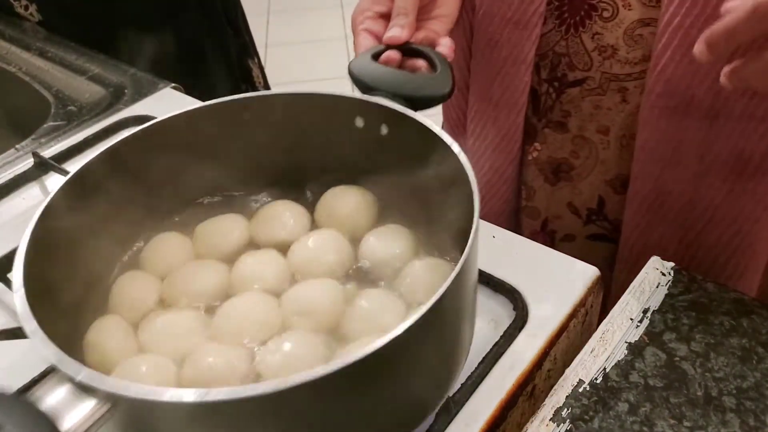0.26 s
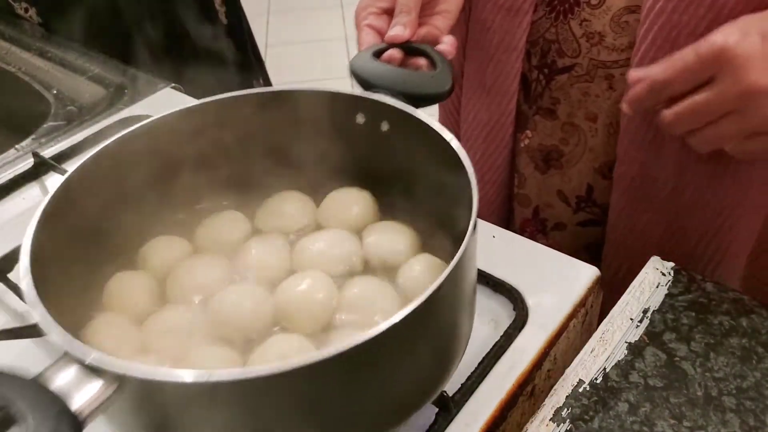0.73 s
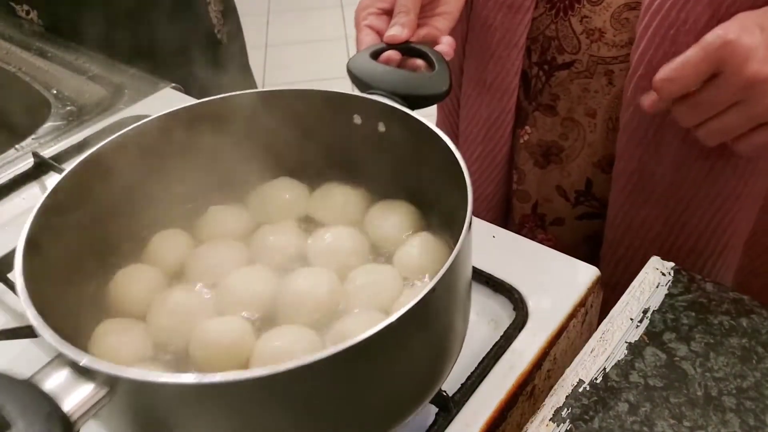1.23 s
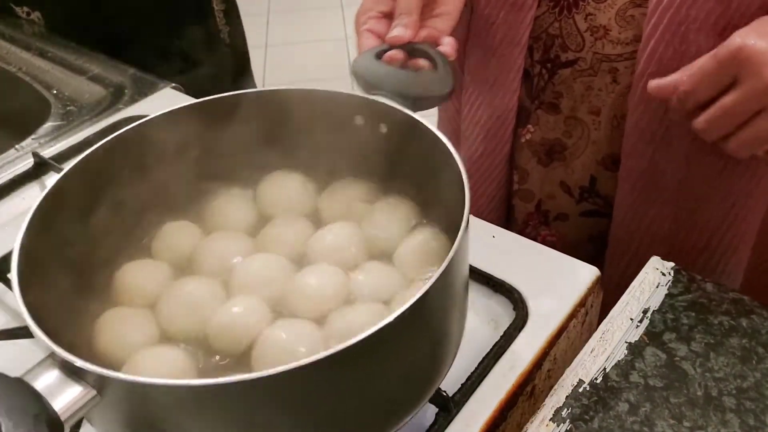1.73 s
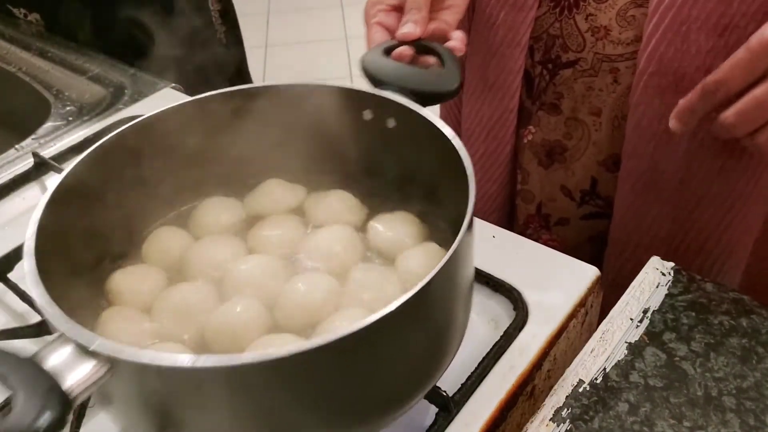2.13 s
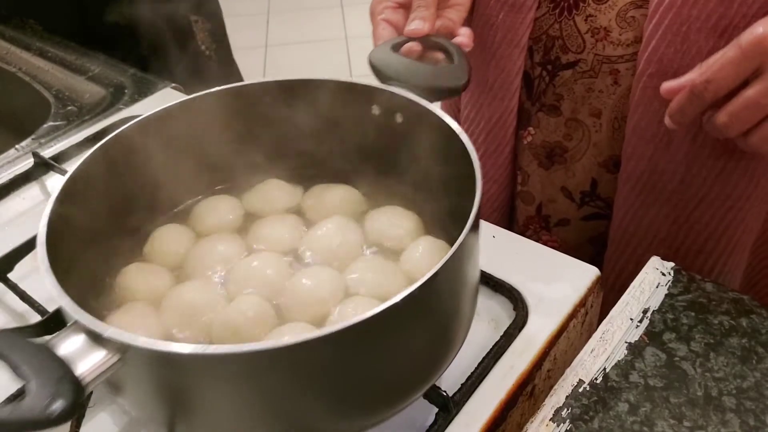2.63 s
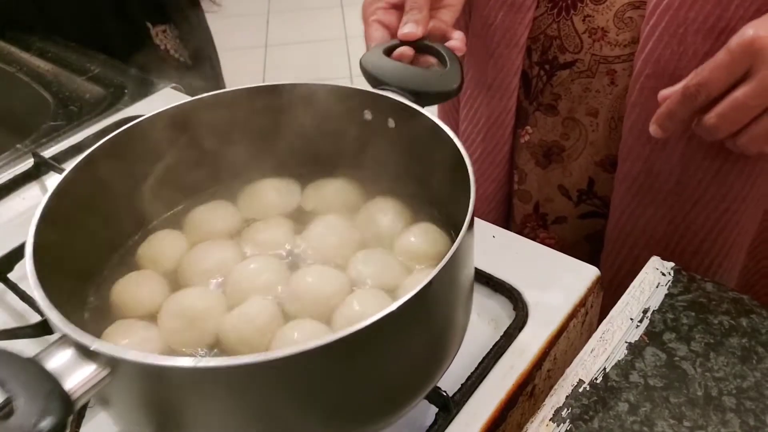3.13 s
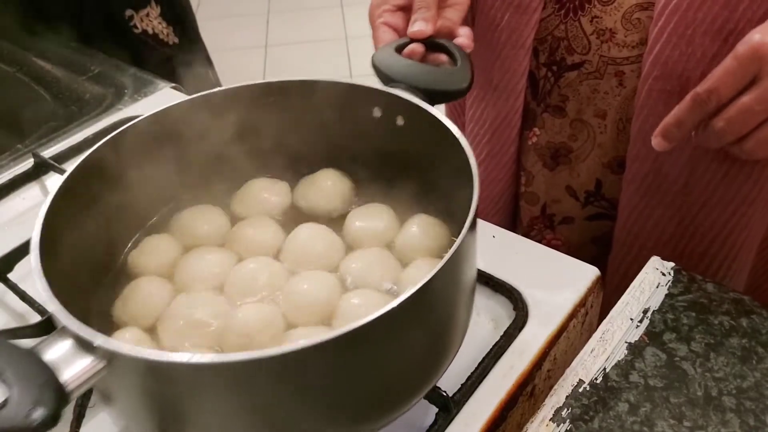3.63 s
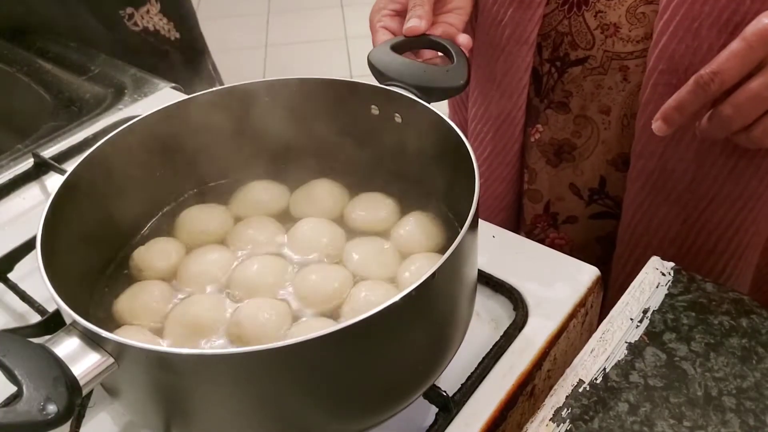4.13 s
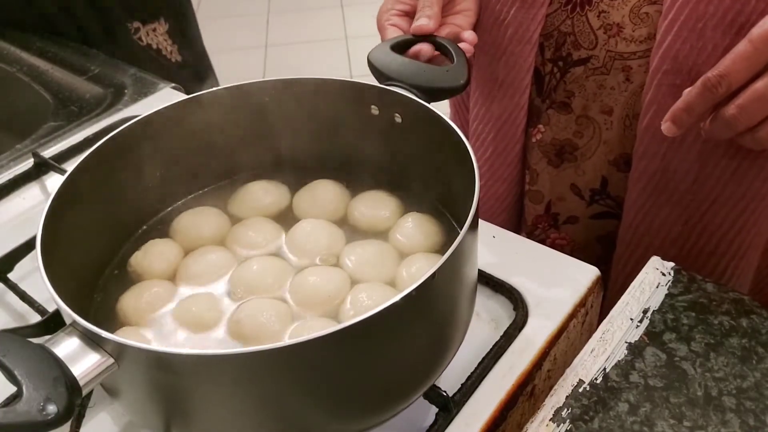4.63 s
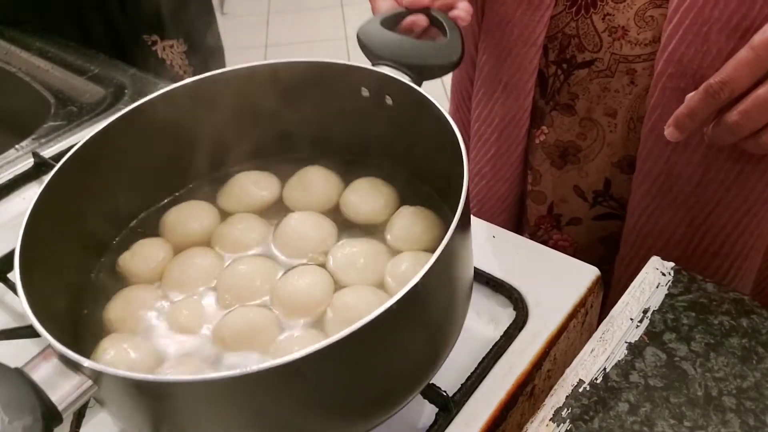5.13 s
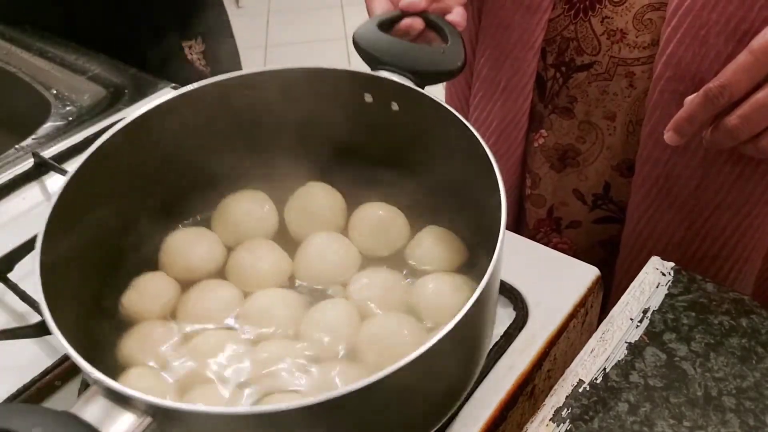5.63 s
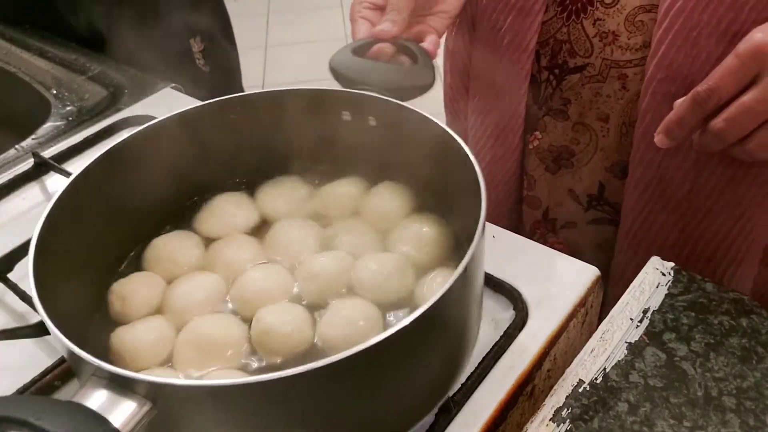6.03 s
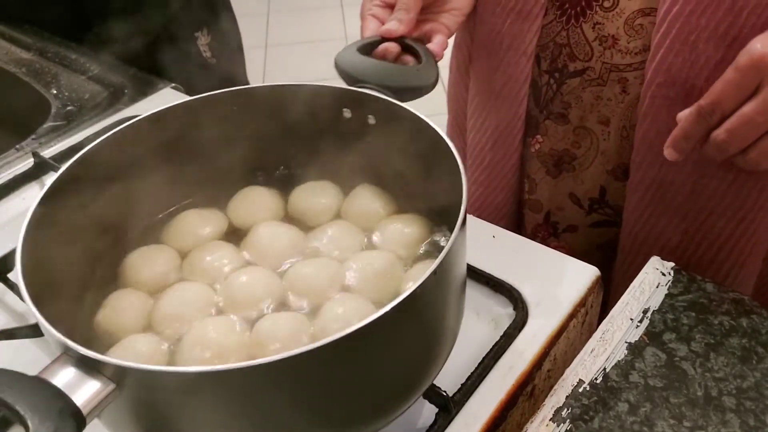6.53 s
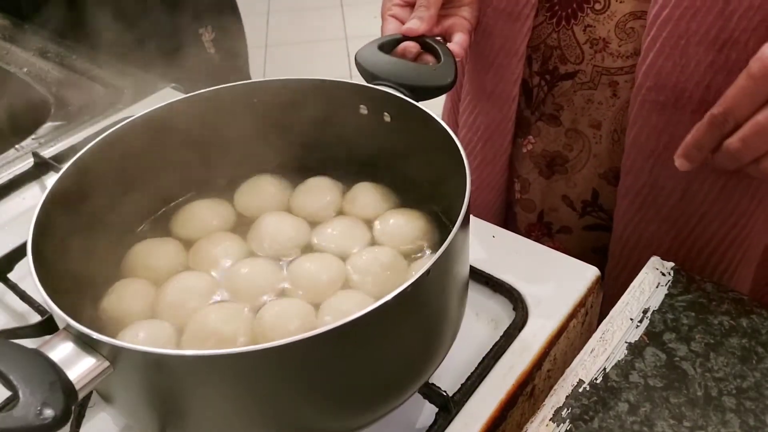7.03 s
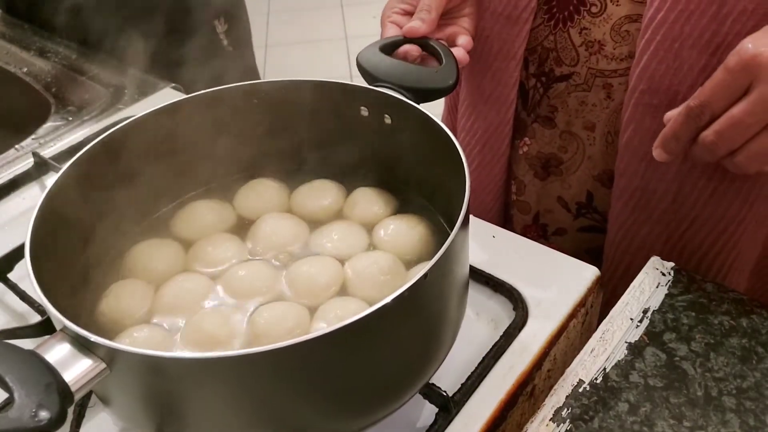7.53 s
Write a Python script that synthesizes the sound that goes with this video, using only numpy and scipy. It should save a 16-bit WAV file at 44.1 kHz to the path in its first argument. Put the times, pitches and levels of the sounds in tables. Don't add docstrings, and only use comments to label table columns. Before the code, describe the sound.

Quick rhythmic pot rubbing and soft dull knocks over burner hiss, then several heavy booming thumps with liquid sloshing, and finally gentle settling.

```python
import sys
import numpy as np
from scipy import signal
from scipy.fft import rfft, irfft, next_fast_len
from scipy.io import wavfile

SR = 44100
rng = np.random.default_rng(int(sys.argv[2]) if len(sys.argv) > 2 else 0)


def transcribe(u):
    v = np.clip(np.atleast_2d(u).T, -1, 1)
    q = np.round(v * 32767).astype(np.int16)
    wavfile.write(sys.argv[1], SR, q)


def gain_from_db(level_db):
    decades = np.asarray(level_db, float) / 20
    return 10 ** decades


N = 342392

# (frequency [Hz], level [dB per Hz])
HISS = [(30, 2.5), (100, 3), (250, -12.5), (550, -1.5), (900, -1), (1400, 1), (2500, -7), (3700, -7.5),
        (5700, -9.5), (8000, -5), (11000, -22.5), (13000, -33), (16000, -13)]
# (pitch [Hz], width [Hz], level [dB])
CAVITIES = [(664, 22, -67), (1898, 227, -56.5), (1871, 18, -67), (1902, 16, -68), (4440, 51, -68),
            (6910, 82, -69.5), (2470, 15, -67.5), (4527, 250, -59), (7056, 530, -59.5), (8260, 490, -68),
            (9124, 150, -65.5), (12400, 1300, -70), (13740, 350, -80)]
# (time [s], middle whistle level [dB], hiss level [dB])
FLOW = [(0.0, -65.5, -52), (0.5, -60.5, -50.5), (0.73, -59.5, -51), (1.23, -61, -52), (1.49, -58, -51),
        (2.2, -59.5, -50), (2.42, -61, -50.5), (3.63, -63.5, -50.5), (4.21, -60.5, -52), (4.43, -64, -55),
        (5.4, -63.5, -52.5), (5.84, -62.5, -53), (6.07, -64, -50.5), (7.13, -63, -52), (7.76, -65.5, -53.5)]
# (frequency [Hz], width [Hz], depth [0-1])
ECHO_DIPS = [(3680, 330, 0.44), (6250, 270, 0.83), (5650, 360, 0.7)]
# (frequency [Hz], likeness [-1 to 1])
LIKENESS = [(60, 0.7), (180, 0.99), (550, 0.43), (1650, -0.067), (4970, -0.028), (15000, -0.022)]
# (frequency [Hz], left over right [dB])
LEAN = [(600, 0.8), (1900, -1.5), (3300, -8.5), (4800, 3.5), (6900, -2.5), (9000, 5), (10500, -11),
        (15000, 1)]
# (time [s], peak [dB], pitch [Hz])
BUMPS = [(0.027, -35.5, 251), (0.176, -38, 223), (0.192, -34, 220), (0.193, -30.5, 312), (0.331, -37, 475),
         (0.485, -32, 320), (0.608, -36, 336), (0.646, -35, 248), (0.773, -37.5, 306), (0.793, -37, 255),
         (0.869, -35, 242), (0.909, -41, 258), (1.043, -42, 699), (1.043, -33.5, 318), (1.136, -44, 226),
         (1.313, -34, 306), (1.411, -32, 243), (1.566, -40, 256), (1.566, -31, 303), (1.588, -36, 240),
         (1.614, -29, 336), (1.707, -33, 330), (1.746, -28, 428), (1.882, -37, 221), (1.882, -30.5, 347),
         (1.912, -30, 470), (1.987, -43, 219), (1.989, -34, 320), (2.03, -35, 339), (2.122, -38, 423),
         (2.152, -38, 221), (2.154, -24.5, 328), (2.258, -32, 347), (2.301, -37, 248), (2.416, -37, 285),
         (2.522, -33, 283), (2.543, -41, 441), (2.648, -32, 299), (2.684, -26.5, 300), (2.788, -42, 307),
         (2.801, -36, 345), (2.921, -35.5, 293), (3.043, -37, 353), (3.054, -36, 221), (3.056, -28, 357),
         (3.093, -27, 480), (3.217, -27, 487), (3.228, -32, 227), (3.361, -42, 220), (3.362, -34, 344),
         (3.5465, -26, 500), (3.546, -26, 339), (3.636, -33.5, 304), (3.651, -32, 286), (3.675, -33, 312),
         (3.702, -28.5, 424), (3.819, -42, 320),
         (4.013, -33, 270), (4.08, -37, 275), (4.098, -34.5, 272), (4.12, -31, 406), (4.52, -41, 371),
              (4.529, -37, 277), (4.62, -44, 400), (4.718, -47, 646), (5.063, -32, 270), (5.079, -26, 295),
              (5.12, -28, 395), (5.173, -40, 272), (5.333, -51, 441), (5.354, -44, 530), (5.423, -25, 355),
              (5.503, -27, 341), (5.558, -35, 395), (5.625, -34, 339), (5.679, -44, 296), (5.711, -48, 339),
              (5.873, -33, 326), (5.982, -45, 338), (6.025, -42, 336), (6.057, -47, 312), (6.098, -41, 316),
              (6.136, -41, 362), (6.253, -41, 460), (6.386, -46, 340), (6.429, -44, 280), (6.438, -36, 470),
              (6.544, -41, 364), (6.567, -39, 495), (6.642, -41, 362), (6.782, -51, 700), (6.782, -38, 353),
              (6.917, -46, 460), (7.02, -43, 376)]
# (peak time [s], level [dB], relative grit [dB], relative sheet boom [dB], boom pitch [Hz])
JIGGLES = [(0.033, -47, -16.5, 6, 116), (0.206, -44.5, -17, 0, 105), (0.335, -46, -17.5, -3, 98),
           (0.503, -46.5, -20, 0, 113), (0.654, -50, -19.5, 0.5, 110), (0.799, -44, -20.5, -3, 105),
           (0.9, -42.5, -23, -3, 95), (1.063, -44, -19, -2, 94), (1.2, -51, -20.5, 1.5, 90),
           (1.345, -41.5, -21, 5, 110), (1.431, -41.5, -21.5, 2, 108), (1.509, -51, -23, -1, 108),
           (1.609, -37.5, -22, -2, 118), (1.718, -37, -25, -2, 116), (1.8, -50, -21, -9, 130),
           (1.907, -41, -22, 6, 116), (2.018, -38.5, -22, 3.5, 113), (2.174, -36, -24, -6, 90),
           (2.294, -39, -23.5, -1, 116), (2.437, -43.5, -20.5, -4, 105), (2.557, -43, -22, 2, 95),
           (2.693, -42, -23, 4, 110), (2.818, -45, -29, 4.5, 108), (2.95, -45.5, -23, -1, 132),
           (3.073, -39, -22, 0, 116), (3.236, -42, -19.5, 0.5, 113), (3.372, -37, -20.5, -5, 142),
           (3.554, -40.5, -21, 1.5, 110), (3.695, -43, -20, 4.5, 113), (3.829, -48, -19, -10, 121)]
# (peak time [s], level [dB], relative grit [dB], relative sheet boom [dB], boom pitch [Hz])
SETTLING = [(6.016, -51, -20, -1, 142), (6.176, -48.5, -19.5, -11, 142), (6.308, -47.5, -18, -5, 102),
            (6.45, -51.5, -15.5, -4, 110), (6.561, -52, -14.5, 3, 113), (6.675, -52.5, -17.5, -6, 140),
            (6.795, -52.5, -20, -7, 95), (6.925, -52, -20, -4, 100), (7.03, -59, -10.5, -10, 130),
            (7.374, -57.5, -14, 5, 116), (7.44, -58.5, -37, 4, 118), (7.681, -66, -5.5, 23, 108)]
# (peak time [s], level [dB], rise [ms], fall [ms], relative grit [dB])
LANDINGS = [
    (4.021, -40.5, 22, 30, -37),
    (4.112, -33.5, 23, 15, -34),
    (4.54, -41, 21, 23, -27.5),
    (4.732, -57.5, 150, 73, -15.5),
    (5.092, -26, 16.4, 35.4, -46),
    (5.358, -56.5, 23, 14, -16),
    (5.428, -38, 6, 13, -15),
    (5.507, -36, 20, 28, -35),
    (5.569, -43, 14, 70, -21.5),
    (5.88, -40.5, 12.4, 22, -27),
]
# (pitch [Hz], width [Hz], level [dB])
BODY = [(156, 32, 2), (269, 380, -3), (220.4, 69, -0.5), (347.3, 43, -2.5), (413, 42, -3)]
# (pitch [Hz], width [Hz], level [dB])
WALL = [(465, 35, -2.5), (597, 41, -7), (640, 18.5, -4), (752, 35, -17)]
# (pitch [Hz], width [Hz], level [dB])
RIM = [(845, 46, 8.5), (1007, 83, 8), (1114, 68, 8), (1234, 62, 7), (1434, 250, 11), (1700, 440, 12.5),
       (2068, 100, 9.5), (2500, 89, 6.5), (3200, 7000, 13.5)]
# (peak time [s], level [dB], fall [ms], pitch [Hz])
ROCKS = [(0.074, -47, 49, 60), (0.221, -54, 50, 65.4), (0.69, -51, 30, 60), (0.497, -51, 28, 72.4),
         (1.07, -54, 40, 62), (0.853, -42, 23, 63), (1.231, -51, 24, 72), (1.556, -35, 68, 58),
         (1.769, -46, 50, 57), (1.89, -36, 62, 53.3), (2.33, -47, 110, 60), (2.214, -27, 15, 57),
         (2.58, -26, 25, 63.5), (2.826, -46, 28, 66.3), (2.971, -35, 32, 61), (3.106, -45, 36, 64.6),
         (3.34, -49, 60, 69), (3.639, -50, 70, 65.5), (4.039, -33, 15, 58), (4.104, -16.5, 15, 64.6),
         (4.55, -18, 33, 57), (4.688, -41, 26, 52), (5.102, -26, 31, 65), (5.357, -47, 63, 57.6),
         (5.47, -40, 44, 70), (5.58, -39, 30, 68), (5.638, -37, 33, 60), (5.916, -39.5, 33, 64.5),
         (6.503, -52, 46, 58), (7.4, -47, 57, 66.6), (7.67, -39.5, 23, 62)]
# (peak time [s], level [dB], rise [ms], fall
# [ms], pitch [Hz])
SWINGS = [(0.557, -47.5, 15, 53, 113), (0.858, -41, 30, 15, 108), (1.759, -40.5, 8.9, 35, 142),
          (2.483, -41, 16, 29, 105), (3.46, -48, 22, 27, 143), (3.754, -52, 18, 33, 123),
          (4.03, -41, 31, 19, 101.9), (4.105, -23.5, 22, 39, 110.4), (4.122, -41.5, 23, 61, 413),
          (4.144, -34, 12, 30, 109), (4.174, -33.5, 20, 33, 78.7), (4.535, -29.5, 14, 40, 111),
          (4.752, -56, 23, 71, 108), (5.084, -38, 12, 40, 209), (5.118, -22, 25, 27, 94),
          (5.242, -44.5, 11, 24, 129), (5.434, -24.5, 9, 55, 91), (5.573, -27.5, 31, 20, 100.5),
          (5.7, -41.5, 14, 54, 93), (5.889, -46, 8, 85, 145), (6.233, -56, 15, 30, 110),
          (5.36, -43.5, 30, 72, 107.5), (7.415, -49, 14, 18, 118), (7.734, -43, 38, 22, 115)]
# (time [s],
# peak [dB], pitch [Hz])
GULPS = [(5.421, -26, 1580), (5.427, -29, 1170), (5.427, -28, 2470), (5.435, -28, 2500), (5.449, -32, 1270),
         (0.194, -34.5, 730), (0.208, -37, 803), (0.909, -44, 844), (1.606, -27.5, 1320),
         (1.617, -32, 1280), (1.699, -33, 1230), (1.708, -27, 1340), (2.304, -33, 1040), (3.057, -38, 1560),
         (3.197, -40, 875), (3.222, -33, 1370), (3.387, -33.5, 640), (3.531, -32, 1220), (3.553, -33, 1130),
         (3.703, -40, 890), (6.555, -28, 1700), (6.562, -31, 1900), (6.929, -44, 865)]
# (time [s], peak [dB], pitch [Hz])
POPS = [(0.195, -30, 1110), (0.337, -36, 875), (1.333, -42, 1910), (1.342, -40, 869), (1.412, -43, 845),
        (1.59, -30, 1870), (1.606, -33, 1350), (1.708, -36, 953), (1.708, -33, 1250), (1.886, -38, 1850),
        (1.897, -31, 939), (1.99, -38, 875), (2.006, -37, 872), (2.16, -31, 886), (2.304, -41, 895),
        (2.494, -42, 1870), (2.57, -34, 970), (2.65, -34, 867), (3.056, -39, 1570), (3.088, -36, 1120),
        (3.201, -41, 964), (3.219, -38, 1260), (3.315, -41, 1680), (3.36, -32, 1270), (3.38, -40, 977),
        (3.535, -40, 1260), (3.538, -37, 1110), (3.679, -41, 1940), (3.704, -40, 894), (4.102, -40, 870),
        (5.085, -30, 1870), (5.257, -44, 1900), (5.421, -21, 1250), (5.424, -28, 800), (5.811, -41, 1900),
        (5.868, -41, 1990), (5.907, -35, 2040), (6.556, -39, 1650), (7.436, -45, 1910)]
# (time [s], peak [dB], hardness [Hz])
KNOCKS = [(0.196, -26.5, 1490), (1.607, -33, 3500), (1.618, -40, 3500), (2.011, -42, 12000),
          (1.709, -31, 3000), (3.058, -35, 2500), (3.22, -26, 2500), (3.316, -28.5, 2000),
          (3.361, -31, 3000), (5.4215, -17, 5000), (5.426, -28, 4000), (5.438, -31, 4500),
          (5.452, -31, 2500), (5.869, -32, 2500), (5.907, -31.5, 2500), (6.556, -38, 4500),
          (6.563, -40, 4500), (6.572, -33, 3500)]
# (pitch [Hz], width [Hz], level [dB])
BAR = [(345, 70, -4), (640, 160, -7), (1240, 160, -3), (1550, 220, 1), (2500, 220, -1), (3200, 300, -8),
       (4800, 900, -9)]
# (time [s], peak [dB], pitch [Hz])
MORE_BUMPS = [(5.4228, -18, 225), (5.431, -26, 350), (5.443, -25, 350), (1.7095, -26, 140), (5.868, -33, 200),
              (5.913, -32, 175), (4.538, -32, 420), (4.556, -34, 500), (4.116, -30, 627), (1.2, -40, 250),
              (4.142, -28, 150), (4.175, -31, 148), (4.52, -31, 119), (5.076, -27, 390), (5.09, -24, 250),
              (5.62, -32.5, 150), (5.66, -37, 150), (0.22, -34, 280), (3.362, -28.5, 307), (3.232, -32, 460),
              (5.907, -40, 1200), (6.572, -40, 880)]
# (peak time [s], level [dB])
SLOSHES = [(1.62, -58), (1.73, -54), (2.02, -54), (3.38, -50), (4.129, -43), (4.205, -47), (4.58, -52),
           (4.67, -55), (5.12, -41.5), (5.18, -46.5), (5.462, -47), (5.53, -53.5), (5.35, -47.5),
           (5.9, -56), (6.57, -55)]
# (frequency [Hz], level [dB per Hz])
SPLASH = [(500, 4.5), (1200, 0), (2200, 5.5), (3400, -3), (5500, -8), (9000, -9), (15000, -30)]

FLAME_FLUTTER_DB, FLAME_ECHO = 0.4, 0.33
BUMP_CYCLES, BUMP_DB, BUMP_ATTACK_S = 3.1, -1.5, 0.00089
POP_CYCLES, POP_DB = 4.0, -1
GULP_CYCLES = 7.5
PUSH_RISE_MS, PUSH_FALL_MS = 33.3, 35.5
PUSH_QUICKER_MS_PER_DB = 0.75
SHEET_RISE_MS, SHEET_FALL_MS = 27, 33
ROCK_RISE_MS, ROCK_QUICKER_MS_PER_DB = 32, 0.5
SLOSH_RISE_MS, SLOSH_FALL_MS = 29, 44
SPATTER_DB = 2.5
KITCHEN_T60_S, WALL_CUT_HZ, KITCHEN_DB = 0.45, 3600, -14.5


def rms_one(x):
    return x / np.sqrt(np.mean(x ** 2) + 1e-20)


def at_hz(points, hz):
    points = np.array(points)
    return np.interp(np.log(hz), np.log(points[:, 0]), points[:, 1])


def drift(rate):
    r = np.exp(-80 * np.pi * rate / SR)
    white = rng.standard_normal(N // 40 + 2002)
    slow = signal.lfilter([1], [1, -2 * r, r * r], white)[2000:]
    return np.interp(np.arange(N) / 40, np.arange(len(slow)), rms_one(slow))


def resonate(x, hz, width):
    r = np.exp(-np.pi * width / SR)
    top = np.array([1, 0, -1]) * (1 - r * r) / 2
    return signal.lfilter(top, [1, -2 * r * np.cos(2 * np.pi * hz / SR), r * r], x)


def modes(x, table, uneven_db):
    out = 0
    for k, (hz, width, db) in enumerate(table):
        drive = x * gain_from_db(uneven_db * drift(18.0))
        out = out + (-1) ** k * gain_from_db(db) * np.sqrt(SR / width) * resonate(drive, hz, width)
    return out


def swell(s, db, rise_ms, fall_ms):
    at = np.arange(max(int((s - 0.3) * SR), 0), min(int((s + 0.6) * SR), N))
    ms = (at / SR - s) * 1000
    down = np.where(ms < 0, np.abs(ms / rise_ms) ** 2.6, np.abs(ms / fall_ms) ** 1.25)
    return at, gain_from_db(db - 6 * down)


def swells(rows):
    power = np.zeros(N)
    for row in rows:
        at, gain = swell(*row)
        power[at] += gain ** 2
    return np.sqrt(power)


def grains(per_s, spread_db):
    odds = np.minimum(rng.exponential(1, N), 3)
    sizes = gain_from_db(spread_db * odds) * rng.choice([-1, 1], N)
    return rms_one(sizes * (rng.random(N) < per_s / SR))


def banded_noise(spectrum, patchy_db):
    out = 0
    edges = 28 * 2 ** np.arange(0, 9.6, 0.5)
    white = rng.standard_normal((2, 2, N))
    for k, (low, high) in enumerate(zip(edges, edges[1:])):
        band = signal.butter(2, [low, high], "band", fs=SR, output="sos")
        mid, side = signal.sosfilt(band, white[k % 2])
        hz = np.sqrt(low * high)
        alike = np.clip(at_hz(LIKENESS, hz), -1, 1)
        lean_db = np.array([[0.5], [-0.5]]) * at_hz(LEAN, hz)
        gain = gain_from_db(at_hz(spectrum, hz) + patchy_db * drift(17.0) + lean_db)
        out = out + gain * (np.sqrt(1 + alike) * mid + np.sqrt(1 - alike) * side * [[1], [-1]])
    return rms_one(out)


def short_rings(rows, cycles, trim_db, attack_s, glide=0):
    out, t = np.zeros(N + SR), np.arange(SR // 10) / SR
    for s, db, hz in rows:
        fade = np.exp(-t * hz / cycles) * (1 - np.exp(-t / attack_s))
        tone = np.sin(2 * np.pi * hz * t * (1 + glide * t))
        out[round(s * SR):][:len(t)] += gain_from_db(db + trim_db) * fade * tone
    return out[:N]


def burner():
    s, whistle_db, hiss_db = np.transpose(FLOW)
    t = np.arange(N) / SR
    out = gain_from_db(np.interp(t, s, hiss_db)) * banded_noise(HISS, patchy_db=0.7)
    for hz, width, depth in ECHO_DIPS:
        out = out - depth * resonate(out, hz, width)
    white = rng.standard_normal((2, N))
    white[1] = 0.8 * white[1] + 0.6 * np.roll(white[0], 26)
    for hz, width, db in CAVITIES:
        flow_db = np.interp(t, s, whistle_db + 62) if 4000 < hz < 5000 else 0
        ring = rms_one(resonate(resonate(white, hz, width), hz, 2 * width))
        lean_db = np.array([[0.5], [-0.5]]) * at_hz(LEAN, hz)
        out += gain_from_db(db + flow_db + drift(4.8) + lean_db) * ring
    flame = out * gain_from_db(FLAME_FLUTTER_DB * (drift(2.4) + drift(12.0)))
    flame[1] = 0.94 * flame[1] + FLAME_ECHO * np.roll(flame[0], 16)
    return flame


def dough_bumps():
    return short_rings(BUMPS, BUMP_CYCLES, BUMP_DB, BUMP_ATTACK_S)


def pushes():
    rows = []
    for s, db, grit_db, *_ in JIGGLES + SETTLING:
        rise_ms = np.clip(PUSH_RISE_MS - PUSH_QUICKER_MS_PER_DB * (db + 44), 15, 50)
        rows.append((s, db, rise_ms, PUSH_FALL_MS, grit_db))
    return LANDINGS + rows


def rubbing():
    rows = pushes()
    slips = grains(per_s=900.0, spread_db=1.5)
    low = swells([row[:4] for row in rows]) * slips
    wall_rows = [(s, db + np.clip(0.5 * (grit_db + 23.5), -13, 3), rise, fall)
                 for s, db, rise, fall, grit_db in rows]
    middle = swells(wall_rows) * slips
    grit = 0.83 * slips + 0.77 * grains(per_s=400.0, spread_db=8.0)
    fine = swells([(s, db + grit_db, rise, fall) for s, db, rise, fall, grit_db in rows]) * grit
    fine = signal.lfilter(*signal.butter(2, 3500, fs=SR), fine)
    body = gain_from_db(-10) * modes(low, BODY, uneven_db=2.5)
    wall = gain_from_db(-11.5) * modes(middle, WALL, uneven_db=2.0)
    rim = gain_from_db(-6) * modes(fine, RIM, uneven_db=1.5)
    return body + wall + rim


def swings():
    sheet = [(s, db + boom_db, SHEET_RISE_MS, SHEET_FALL_MS, hz)
             for s, db, _, boom_db, hz in JIGGLES + SETTLING]
    frame = [(s, db, ROCK_RISE_MS - ROCK_QUICKER_MS_PER_DB * (db + 40), fall_ms, hz)
             for s, db, fall_ms, hz in ROCKS]
    return sheet + frame + SWINGS


def booms():
    rows = swings()
    out = np.zeros((2, N))
    phases = rng.random(len(rows)) * 2 * np.pi
    waver = 0.5 * drift(18)
    for (s, db, rise_ms, fall_ms, hz), phase in zip(rows, phases):
        at, gain = swell(s, db, rise_ms, fall_ms)
        lean_db = -0.6 if db > -31 else 0.4
        tone = np.sin(2 * np.pi * hz * (at / SR - s) + phase + waver[at])
        out[:, at] += gain_from_db([[lean_db], [-lean_db]]) * gain * np.sqrt(2) * tone
    band = signal.butter(4, [60, 200], "band", fs=SR, output="sos")
    rough = rms_one(signal.sosfilt(band, rng.standard_normal(N)))
    return out + gain_from_db(-14) * swells([row[:4] for row in rows]) * rough


def gulps():
    return short_rings(GULPS, GULP_CYCLES, 0, attack_s=0.001, glide=0.98)


def pops():
    return short_rings(POPS, POP_CYCLES, POP_DB, BUMP_ATTACK_S)


def knocks():
    blows = np.full(N, 1e-18)
    for s, db, hz in KNOCKS:
        touch = signal.lfilter(*signal.butter(2, hz, fs=SR), np.eye(1, 400)[0])
        blows[round(s * SR):][:400] += gain_from_db(db) * touch
    return gain_from_db(3) * modes(blows, BAR, uneven_db=-1.5)


def more_dough_bumps():
    return short_rings(MORE_BUMPS, BUMP_CYCLES, BUMP_DB, BUMP_ATTACK_S)


def sloshes():
    gain = swells([(s, db, SLOSH_RISE_MS, SLOSH_FALL_MS) for s, db in SLOSHES])
    splash = banded_noise(SPLASH + [(20000, -40)], patchy_db=1.5)
    return gain * splash * gain_from_db(SPATTER_DB * drift(90.0))


def kitchen(x):
    size = next_fast_len(N + SR)
    w = 2 * np.pi * np.arange(size // 2 + 1) / size
    dull = np.exp(-2 * np.pi * WALL_CUT_HZ / SR)
    wall = (1 - dull) / (1 - dull * np.exp(-1j * w))
    out = np.zeros((2, len(w)), complex)
    lags = (rng.uniform(0.008, 0.035, 14) * SR).astype(int)
    for k, lag in enumerate(lags):
        echo = gain_from_db(-60 * lag / SR / KITCHEN_T60_S) * wall * np.exp(-1j * w * lag)
        out[k % 2] += echo / (1 - echo) * (-1) ** (k // 2)
    return irfft(out * rfft(x, size), size)[:, :N]


def scene():
    flame = burner()
    rub = dough_bumps() + rubbing() + pops() + knocks() + more_dough_bumps()
    boom, gulp = booms(), gulps()
    pot = rub + gulp
    direct = np.array([pot, 0.58 * np.roll(pot, 7) + 0.3 * np.roll(pot, 16)])
    direct += gain_from_db(-7) * drift(20.0) * resonate(pot, 550, 500) * [[1], [-1]]
    room = gain_from_db(KITCHEN_DB) * kitchen(rub + gain_from_db(-8) * gulp + gain_from_db(-11) * boom[0])
    boom[1] = np.roll(boom[1], 16)
    return direct + boom + room + sloshes() + flame


def low_pass(x):
    return signal.sosfilt(signal.butter(12, 16020, fs=SR, output="sos"), x)


def record(dry):
    low_cut = signal.butter(4, 43, "high", fs=SR, output="sos")
    high_cut = signal.ellip(12, 0.5, 80, 15700, fs=SR, output="sos")
    mix = signal.sosfilt(high_cut, signal.sosfilt(low_cut, dry))
    return low_pass(mix)


dry = scene()
out = record(dry)
transcribe(out)
```